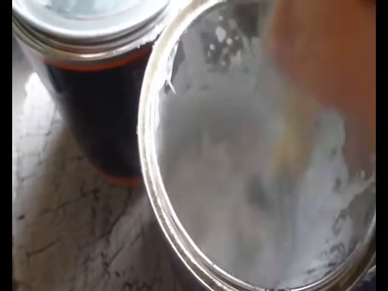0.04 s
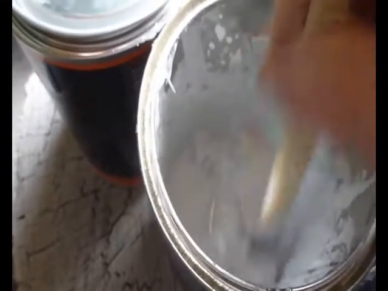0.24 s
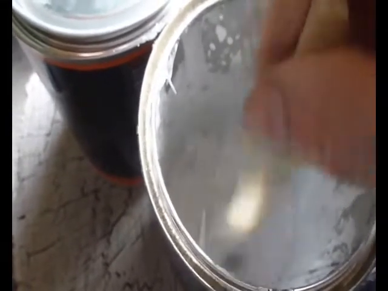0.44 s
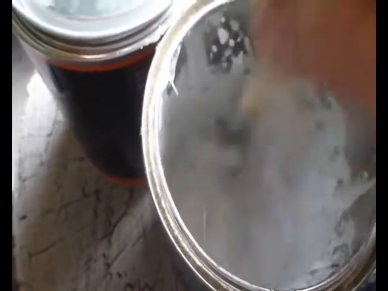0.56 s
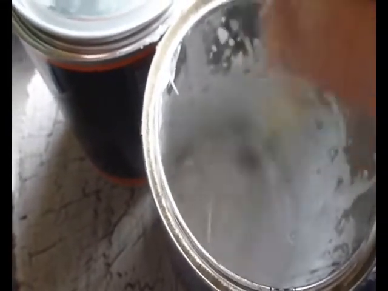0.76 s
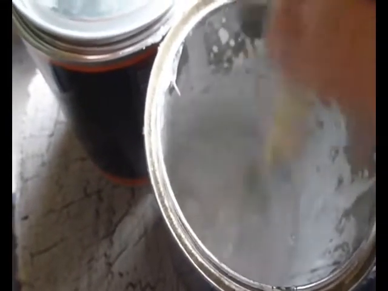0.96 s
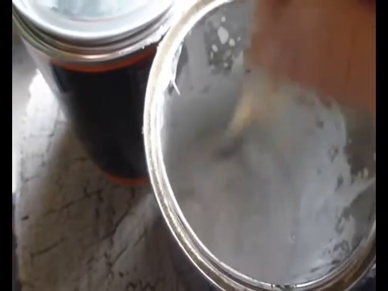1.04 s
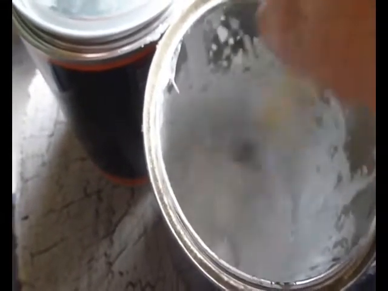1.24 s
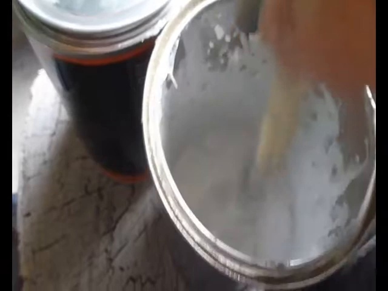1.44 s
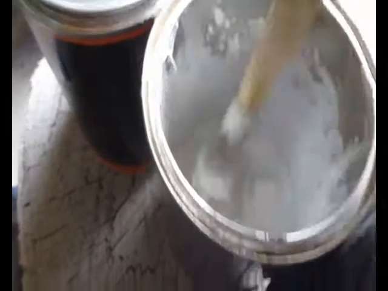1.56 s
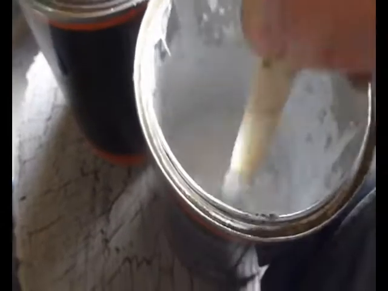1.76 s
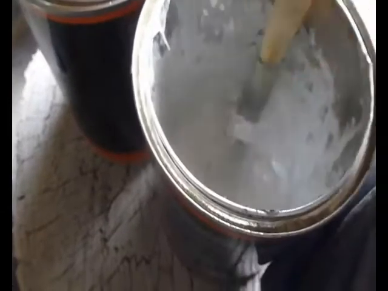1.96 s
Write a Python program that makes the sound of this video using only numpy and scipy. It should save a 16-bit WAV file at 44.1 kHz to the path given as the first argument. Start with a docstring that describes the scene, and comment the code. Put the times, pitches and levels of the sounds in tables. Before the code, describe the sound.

Close up, rapid rasping stirring strokes in a metal can, with short squeaky catches and soft hollow churning of wet sealant, stop near the end, leaving a few light knocks over a faint outdoor hush.

```python
"""A wooden stick stirs thick sealant in a metal can in nineteen quick strokes, then stops.
Random grit and tiny squeaks, passed through the can's resonances, make its rasp, loudest mid-stroke;
now and then the tip catches with a gliding chirp. Random pops churn the sealant, with rising tones
as glugs and short noise bursts as wet smacks. Damped knocks tick on the can, mostly at the end.
A faint scatter of echoes and a quiet outdoor hush of coloured noise lie behind."""
import sys
import numpy as np
from scipy import signal
from scipy.fft import rfft, irfft, next_fast_len
from scipy.io import wavfile

SR = 44100
rng = np.random.default_rng(int(sys.argv[2]) if len(sys.argv) > 2 else 0)


def wav_record(signal):
    """Record a signal, one row per channel, as 16-bit PCM in the file named by sys.argv[1]."""
    frames = np.transpose(np.atleast_2d(signal))
    bounded = np.clip(frames, -1, 1)
    # unit amplitude maps onto the largest positive 16-bit level
    quanta = np.round(bounded * 32767).astype(np.int16)
    wavfile.write(sys.argv[1], SR, quanta)


N = 88552
T = np.arange(N) / SR   # time in seconds
PADDED = next_fast_len(N, True)
BINS = np.arange(PADDED // 2 + 1) * SR / PADDED   # frequencies of a spectrum in Hz

# The strokes of the stick. Each row: start in seconds, fastest moment in seconds, end in seconds,
# level in dB, brightness in dB per octave.
STROKES = [(-.03, 0.042, 0.12, -29, -0.5), (0.112, 0.153, 0.19, -27.5, 0.5),
           (0.184, 0.204, 0.21, -35, -5.5), (0.214, 0.301, 0.36, -28.5, 0), (.358, 0.404, 0.42, -27.5, 2),
           (0.432, 0.436, 0.46, -31, -2), (0.455, 0.508, 0.58, -32.5, 0.5), (0.539, 0.568, 0.58, -33.5, -1),
           (0.594, 0.654, 0.69, -27.5, 1), (0.706, 0.756, 0.823, -31, -0.5),
           (0.834, 0.838, 0.86, -35, -5.5), (0.845, 0.872, 0.94, -28.5, -1.5),
           (0.949, 0.964, 1.051, -29.5, 1.5), (1.062, 1.121, 1.154, -28, -1),
           (1.173, 1.227, 1.264, -27.5, 0), (1.28, 1.34, 1.372, -28, -0.5), (1.396, 1.468, 1.488, -29, -1),
           (1.519, 1.563, 1.584, -27.5, -2), (1.646, 1.691, 1.721, -27, 0.5)]
SPEED_POWER = 0.6   # how loudness grows with speed


def stirring():
    """Tip speed (0-1), scrape strength and brightness: each stroke speeds up and slows down again."""
    speed, strength, bright = np.zeros((3, N))
    for start, fastest, end, db, tilt in STROKES:
        progress = np.interp(T, [start, fastest, end], [0, .5, 1])
        arc = np.maximum(np.sin(np.pi * progress), 0)
        speed = np.maximum(speed, arc)
        strength = strength + from_db(db) * arc ** SPEED_POWER
        bright = bright + tilt * arc
    return speed, strength, bright


STOP_S, STOP_FADE_S = 1.696, 0.042   # the fade falls to about a third in this time


def moving():
    """1 while the stick moves, dying away when it stops."""
    return np.exp(-np.maximum(T - STOP_S, 0) / STOP_FADE_S)


# The colour of the scrape. Each row: frequency in Hz, strength in dB per Hz.
SCRAPE_COLOUR = [(700, -26), (1100, -27.5), (1700, -10.5), (2400, -11.5), (3500, -1.5), (4500, -4),
                 (6000, -5), (7200, -13), (10000, -25), (13000, -22), (15500, -13.5)]
# The low rumble as the can rocks. Each row: frequency in Hz, strength in dB per Hz.
RUMBLE_COLOUR = [(25, -4), (70, -14), (110, -4.5), (190, 4.5), (260, 3), (400, -16.5)]
GRITS_PER_S, GRIT_SPREAD_DB = 6000, 1
RASP_DB, SQUEAK_DB, RUMBLE_DB = -9, -3.5, -31.5   # rasp and squeaks beside the grit, rumble beside the scrape
PATCHY_DB = 0.4
SPEED_TILT_DB = 1.5   # added dB per octave from rest to full speed
DRAG_DB = -39.5   # the tip keeps dragging between strokes
JUDDER_DB, JUDDER_PER_S = 0.55, 57   # uneven pressure on the tip


def scrape():
    """Dense tiny slips of wood on metal and tiny squeaks ring the can, which rumbles under each stroke."""
    speed, strength, bright = stirring()
    grit = colour(grains(GRITS_PER_S, GRIT_SPREAD_DB), SCRAPE_COLOUR)
    grit = grit + from_db(RASP_DB) * rasp(speed) + from_db(SQUEAK_DB) * squeaks(speed)
    tilt_db = bright + SPEED_TILT_DB * (speed - 1.5)
    grit = patchy(can_ring(grit), PATCHY_DB, rate=35, tilt_db=tilt_db)
    rumble = from_db(RUMBLE_DB) * colour(rng.standard_normal(N), RUMBLE_COLOUR)
    loudness = np.hypot(strength, from_db(DRAG_DB) * moving())
    judder = from_db(JUDDER_DB * drift(JUDDER_PER_S))
    return (grit + rumble) * loudness * judder


RASP_SLOW_HZ, RASP_FAST_HZ, RASP_WIDTH_HZ = 1510, 5400, 3300   # the grain passes faster with speed


def rasp(speed, size=64):
    """Grit through a broad resonance that climbs with the speed of the tip."""
    grit = grains(GRITS_PER_S, GRIT_SPREAD_DB)
    out, state = np.zeros(N), np.zeros(2)
    # Move the resonance in short blocks; the state carries its ringing across.
    for i in range(0, N, size):
        hz = RASP_SLOW_HZ + (RASP_FAST_HZ - RASP_SLOW_HZ) * speed[i] ** 2
        b, a = resonance(hz, RASP_WIDTH_HZ)
        out[i:i + size], state = signal.lfilter(b, a, grit[i:i + size], zi=state)
    middle = signal.butter(2, [1200, 6000], "band", fs=SR, output="sos")
    return rms_one(signal.sosfilt(middle, out))


# The filter that colours the squeaks. Each row: frequency in Hz, gain in dB.
SQUEAK_COLOUR = [(1000, -4), (2000, -5), (4000, 0), (6300, 0.5), (7500, -8), (12000, -20)]
SQUEAKS_PER_S, SQUEAK_S = 380, .009   # how many, and their typical length
SQUEAK_SLOW_HZ, SQUEAK_FAST_HZ = 2003, 4388
SQUEAK_SPREAD_OCT, SQUEAK_GLIDE_OCT_PER_S = .5, 4.6   # random spreads of pitch and glide


def squeaks(speed):
    """A swarm of tiny gliding squeaks of the wet tip, higher the faster it goes."""
    out = np.zeros(N)
    chances = rng.standard_normal((int(SQUEAKS_PER_S * N / SR), 5))
    for k, (late, pitch, glide, size, length) in enumerate(chances):
        s = (k + late) / SQUEAKS_PER_S
        speed_now = speed[np.clip(int(s * SR), 0, N - 1)]
        hz = SQUEAK_SLOW_HZ + (SQUEAK_FAST_HZ - SQUEAK_SLOW_HZ) * speed_now
        hz = hz * 2 ** (SQUEAK_SPREAD_OCT * pitch)
        squeak_s = SQUEAK_S * 2 ** (length / 2)
        add_chirp(out, s, squeak_s, hz, from_db(2 * size), SQUEAK_GLIDE_OCT_PER_S * glide)
    return colour(out, SQUEAK_COLOUR)


# The ring of the can. Each row: frequency in Hz, width in Hz, typical lift in dB (below 0 is a dip).
CAN_MODES = [(897, 28, 7), (1270, 20, 9), (1860, 54, 6), (2512, 66, 6), (2928, 40, 2.5), (3063, 73, 4.5),
             (3498, 140, 4.5), (3700, 53, 0.5), (4423, 210, 5.5), (4575, 107, 7.5), (5070, 14, 5),
             (5530, 46, 0.5), (7420, 210, -16), (7570, 60, 7.5), (8790, 230, 5.5)]
RING_WANDER_DB, RING_WANDER_PER_S = 0.9, 9


def can_ring(x):
    """The modes of the can, each answering more or less as it wavers at random."""
    out = x
    for hz, width_hz, db in CAN_MODES:
        wander = from_db(RING_WANDER_DB * drift(RING_WANDER_PER_S))
        ring = signal.lfilter(*resonance(hz, width_hz), x)
        out = out + (from_db(db) - 1) * wander * ring
    return rms_one(out)


# The tip catches and chirps. Each row: middle in seconds, length in seconds, pitch in Hz, level in dB.
CATCHES = [(0.086, 0.045, 2100, -37), (0.095, 0.048, 3050, -33), (0.16, 0.024, 4450, -23.5),
           (.168, 0.013, 3150, -30), (0.239, 0.019, 3000, -29), (.388, 0.0091, 2250, -27),
           (0.638, 0.016, 4960, -22.5), (0.675, 0.0088, 3520, -21.5), (.769, 0.0065, 4520, -23.5),
           (0.798, 0.0062, 3150, -25.5), (1.011, 0.024, 4560, -28), (1.129, 0.0081, 4500, -27),
           (1.207, 0.0067, 3500, -20.5), (1.263, 0.0086, 2700, -29.5), (1.312, 0.0068, 3600, -23),
           (1.674, 0.037, 3150, -28), (1.709, .012, 2400, -36)]
CATCH_GLIDE_OCT_PER_S = -1.5


def catches():
    """Brief stick-slip chirps that sag in pitch."""
    out = np.zeros(N)
    for s, length, hz, db in CATCHES:
        add_chirp(out, s, length, hz, from_db(db), CATCH_GLIDE_OCT_PER_S)
    return out


def add_chirp(out, s, length, hz, gain, glide):
    """Add one bell-shaped chirp that glides by octaves per second."""
    first = max(int((s - 2 * length) * SR), 0)
    last = max(int((s + 2 * length) * SR), 0)
    near = slice(first, last)
    age = T[near] - s
    bell = np.exp(-(2 * age / length) ** 2)
    out[near] += gain * bell * np.sin(2 * np.pi * hz * age * 2 ** (glide * age / 2))


# The colour of the churning pops. Each row: frequency in Hz, strength in dB per Hz.
CHURN_COLOUR = [(30, -30), (120, -64), (185, -7), (270, -23), (400, -4), (600, -2.5), (780, -4.5),
                (1000, -1.5), (1700, 2.5), (3000, -17)]
# How hard the sealant is churned. Each row: time in seconds, level in dB.
CHURNING = [(0, -46.5), (.15, -40), (.26, -45.5), (.38, -44), (.45, -44.5), (.54, -47), (.64, -42),
            (.73, -42.5), (.77, -49.5), (.88, -37.5), (.97, -45.5), (1.08, -42.5), (1.2, -44.5),
            (1.39, -42.5), (1.46, -45), (1.58, -43), (1.69, -44.5), (1.79, -54)]
HOLLOW_HZ, HOLLOW_WIDTH_HZ, HOLLOW_DB = 505.6, 63, 15   # air in the can
POPS_PER_S, POP_SPREAD_DB, CHURN_PATCHY_DB = 2500, 3, 2.7


def churning():
    """Random pops of the sealant resonate in the hollow of the can."""
    pops = colour(grains(POPS_PER_S, POP_SPREAD_DB), CHURN_COLOUR)
    churn = lift(pops, [(HOLLOW_HZ, HOLLOW_WIDTH_HZ, HOLLOW_DB)])
    churn = rms_one(patchy(churn, CHURN_PATCHY_DB, rate=24))
    return from_db(np.interp(T, *np.transpose(CHURNING))) * churn * moving()


# Air pockets glug in the sealant. Each row: start in seconds, starting pitch in Hz, level in dB.
GLUGS = [(0.201, 467, -29), (0.223, 448, -36.5), (.432, 507, -32), (.607, 533, -36), (.629, 506, -30.5),
         (.877, 483, -22), (.894, 540, -27), (.904, 613, -25.5), (.928, 534, -33), (0.945, 507, -31),
         (1.076, 492, -37), (1.152, 517, -35.5), (1.252, 532, -49), (1.294, 513, -31), (1.356, 496, -32.5),
         (1.382, 592, -35), (1.559, 465, -29), (1.625, 504, -46)]
GLUG_ATTACK_S, GLUG_T60_S = .006, .04   # swell time, then time to fall by 60 dB
GLUG_RISE_PER_S = 1.5   # share of the starting pitch gained per second


def glugs():
    """Each air pocket is a short tone that swells, dies away and rises in pitch."""
    out = np.zeros(N)
    for s, hz, db in GLUGS:
        age = np.maximum(T - s, 0)
        swell = np.sin(np.pi / 2 * np.minimum(age / GLUG_ATTACK_S, 1)) ** 2
        fall = from_db(-60 * np.maximum(age - GLUG_ATTACK_S, 0) / GLUG_T60_S)
        tone = np.sin(2 * np.pi * hz * age * (1 + GLUG_RISE_PER_S * age / 2))
        out += from_db(db) * swell * fall * tone
    return out


# The sealant parts with a wet smack. Each row: start in seconds, pitch in Hz, peak level in dB.
SMACKS = [(.4315, 1520, -24.5), (.804, 1320, -26.5), (0.909, 1440, -29), (1.746, 1250, -32.5)]
SMACK_WIDTH_HZ, SMACK_T60_S = 920, 0.032


def smacks():
    """Each smack is a short noise burst passed twice through a broad resonance."""
    out = np.zeros(N)
    for s, hz, db in SMACKS:
        b, a = resonance(hz, SMACK_WIDTH_HZ)
        burst = rng.standard_normal(N) * decay(s, SMACK_T60_S)
        smack = signal.lfilter(b, a, signal.lfilter(b, a, burst))
        out += from_db(db) * smack / np.max(abs(smack))
    return out


# Light ticks of stick on can. Each row: start in seconds, level in dB.
TICKS = [(0.4297, -30), (1.767, -50), (1.949, -42.5), (1.9655, -49.5), (1.999, -50)]
# The colour of a tick before the can rings. Each row: frequency in Hz, strength in dB per Hz.
TICK_COLOUR = [(60, -31), (200, -15), (700, -1), (1500, 0.5), (2400, -5), (4200, 1.5), (7000, -14),
               (11000, -25.5), (15000, -18)]
TICK_T60_S = 0.063


def ticks():
    """Short, damped knocks on the wall of the can."""
    knock = rms_one(lift(colour(rng.standard_normal(N), TICK_COLOUR), CAN_MODES))
    return knock * sum(from_db(db) * decay(s, TICK_T60_S) for s, db in TICKS)


ECHO_DB, ECHO_T60_S, ECHO_TOP_HZ = -18.5, 0.25, 6000


def echoes(x):
    """A faint, dull scatter from things nearby, made with a fading noise tail."""
    noise = rng.standard_normal(N) * decay(.006, ECHO_T60_S)
    tail = signal.sosfilt(signal.butter(2, ECHO_TOP_HZ, fs=SR, output="sos"), noise)
    tail = tail / np.sqrt(np.sum(tail ** 2))
    return from_db(ECHO_DB) * signal.fftconvolve(x, tail)[:N]


# The colour of the outdoor hush. Each row: frequency in Hz, strength in dB per Hz.
HUSH_COLOUR = [(30, -45), (70, -34), (110, -36), (150, -8.5), (210, -19), (290, -3), (410, -7), (1400, -11),
               (2200, -13.5), (4500, -14.5), (6500, -28), (15000, -37)]
HUSH_DB = -61.5


def hush():
    """Quiet, steady coloured noise for the outdoors."""
    return from_db(HUSH_DB) * colour(rng.standard_normal(N), HUSH_COLOUR)


def from_db(db):
    """Decibels to gain."""
    return 10 ** (np.asarray(db) / 20)


def rms_one(x):
    """Scale to rms 1."""
    return x / np.sqrt(np.mean(x ** 2) + 1e-20)


def at_hz(points, hz):
    """Read a spectrum on a log-frequency axis."""
    f, db = np.transpose(points)
    return np.interp(np.log(hz + 1), np.log(f), db)


def colour(x, points):
    """Filter a signal by a spectrum; rms 1."""
    return rms_one(irfft(rfft(x, PADDED) * from_db(at_hz(points, BINS)), PADDED)[:N])


def drift(rate):
    """Slow chance with spread 1, made at one fortieth of the sample rate."""
    r = np.exp(-80 * np.pi * rate / SR)
    noise = rng.standard_normal(N // 40 + 2002)
    slow = signal.lfilter([1], [1, -2 * r, r * r], noise)[2000:]   # skip the filter's start
    return np.interp(np.arange(N) / 40, np.arange(len(slow)), rms_one(slow))


def resonance(hz, width_hz):
    """Filter coefficients of a resonance with gain 1 on top."""
    r = np.exp(-np.pi * width_hz / SR)
    b = np.array([1, 0, -1]) * (1 - r * r) / 2
    return b, [1, -2 * r * np.cos(2 * np.pi * hz / SR), r * r]


def lift(x, modes):
    """Raise or lower a signal around each mode in turn."""
    for hz, width_hz, db in modes:
        x = x + (from_db(db) - 1) * signal.lfilter(*resonance(hz, width_hz), x)
    return x


def grains(per_s, spread_db):
    """Random clicks of uneven size; rms 1."""
    sizes = from_db(spread_db * np.minimum(rng.exponential(1, N), 4))
    sizes = sizes * rng.choice([-1, 1], N)
    return rms_one(sizes * (rng.random(N) < per_s / SR))


def decay(s, t60):
    """Sudden start, then a steady fall of 60 dB in t60 seconds."""
    return (T >= s) * from_db(-60 * np.maximum(T - s, 0) / t60)


def patchy(x, depth_db, rate, tilt_db=0):
    """Let each half-octave waver on its own, and tilt the middle range by dB per octave."""
    octave = np.log2(np.maximum(BINS, 1) / 4000)   # octaves above 4000 Hz
    spectrum, out = rfft(x, PADDED), 0
    for centre in np.arange(-7, 2.6, .5):
        share = np.maximum(1 - 2 * abs(octave - centre), 0)
        band = irfft(spectrum * share, PADDED)[:N]
        out = out + band * from_db(depth_db * drift(rate) + tilt_db * np.clip(centre, -2, .7))
    return out


def scene():
    """The can close up, its echoes and the outdoor hush."""
    sealant = churning() + glugs() + smacks()
    can = scrape() + catches() + sealant + ticks()
    return (can + echoes(can) + hush())[None]


CUTOFF_HZ = 15850


def record(dry):
    """The top is cut steeply."""
    return signal.sosfilt(signal.ellip(12, .1, 80, CUTOFF_HZ, fs=SR, output="sos"), dry)


dry = scene()
out = record(dry)
wav_record(out)
```